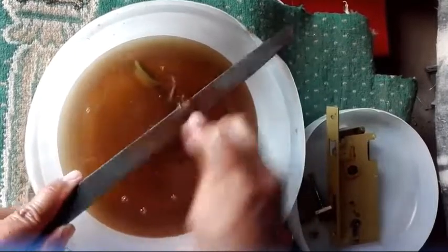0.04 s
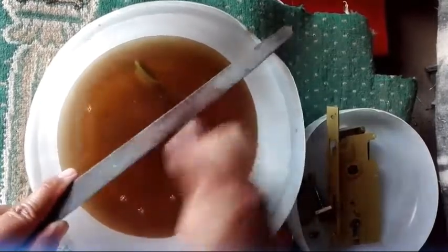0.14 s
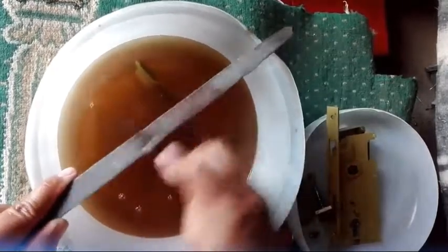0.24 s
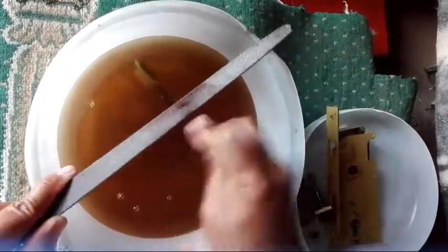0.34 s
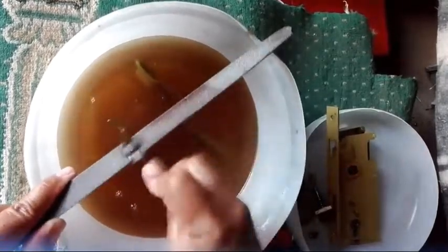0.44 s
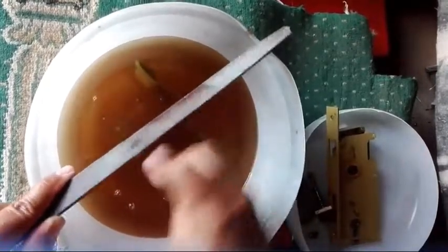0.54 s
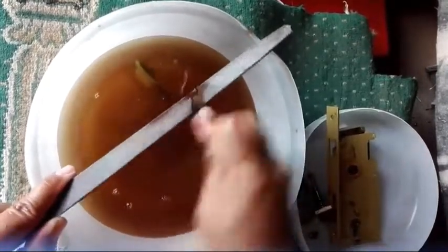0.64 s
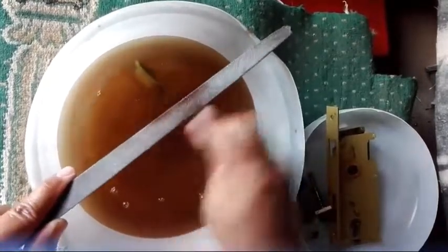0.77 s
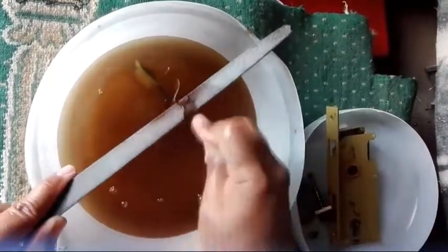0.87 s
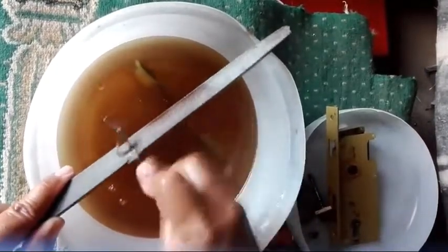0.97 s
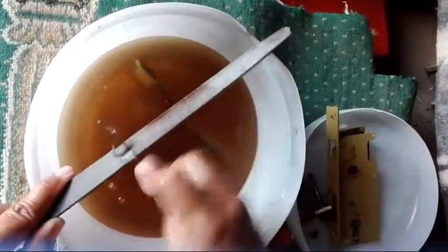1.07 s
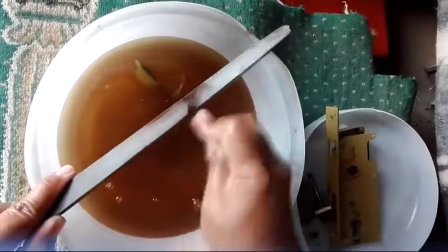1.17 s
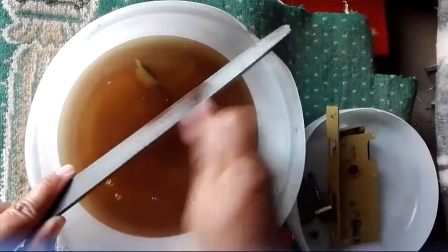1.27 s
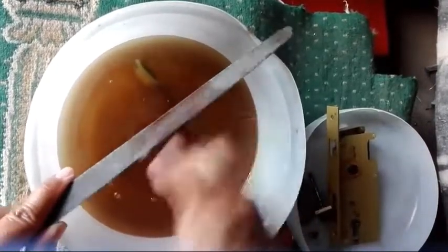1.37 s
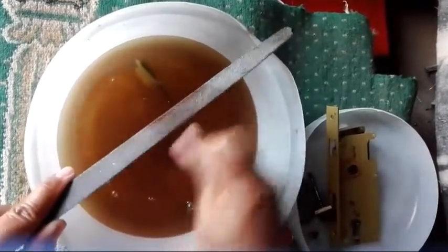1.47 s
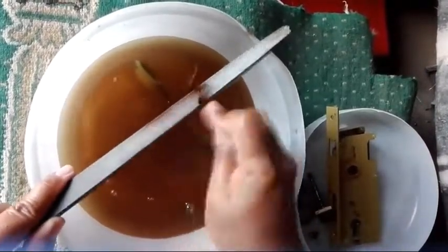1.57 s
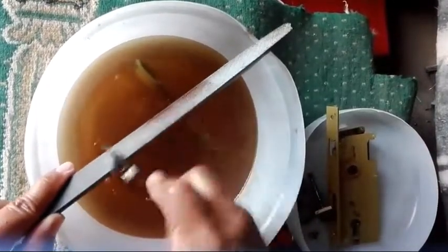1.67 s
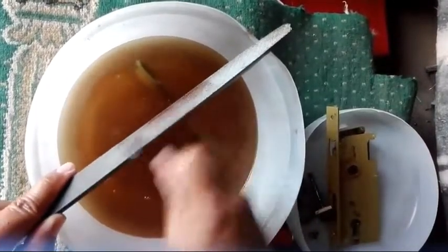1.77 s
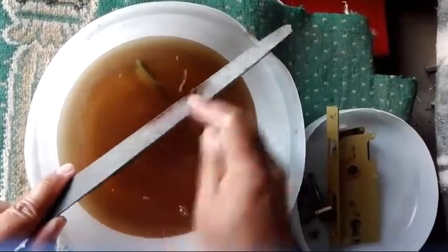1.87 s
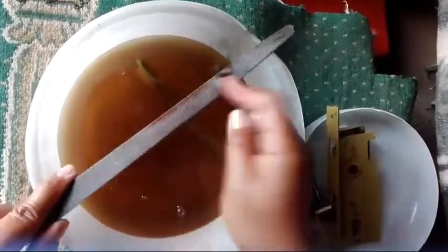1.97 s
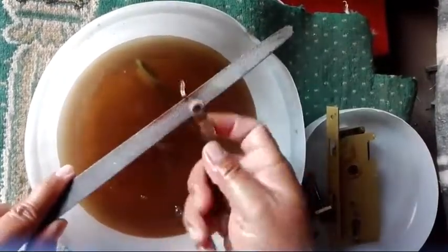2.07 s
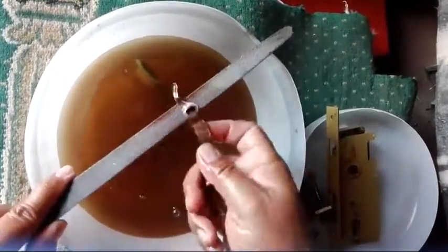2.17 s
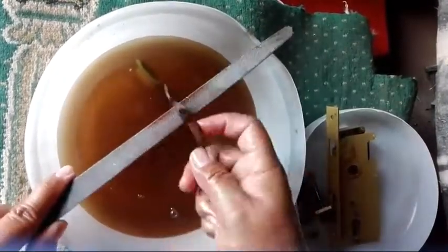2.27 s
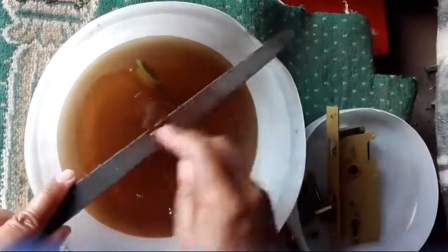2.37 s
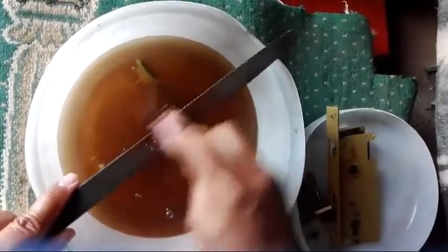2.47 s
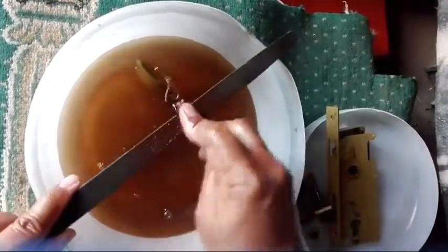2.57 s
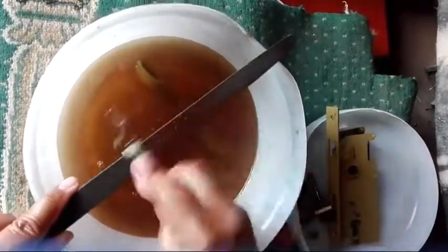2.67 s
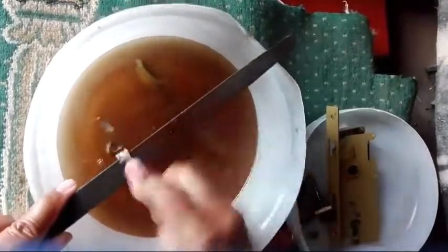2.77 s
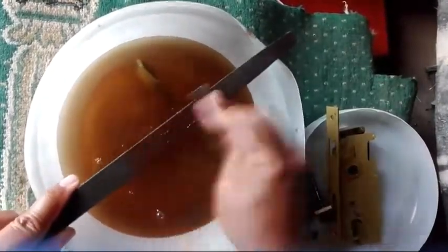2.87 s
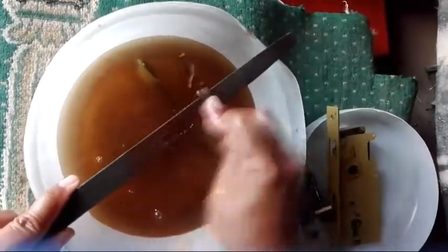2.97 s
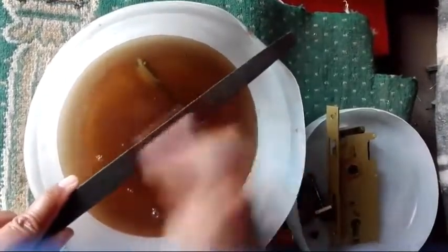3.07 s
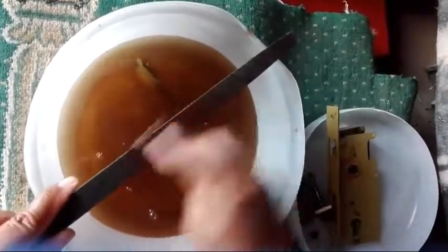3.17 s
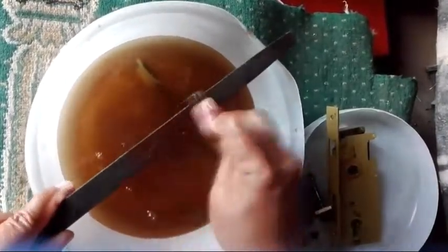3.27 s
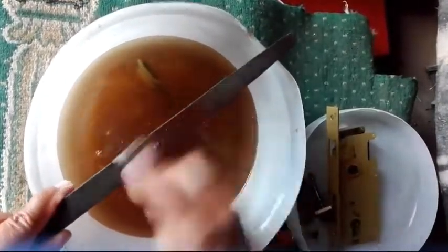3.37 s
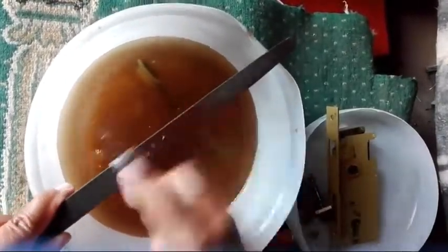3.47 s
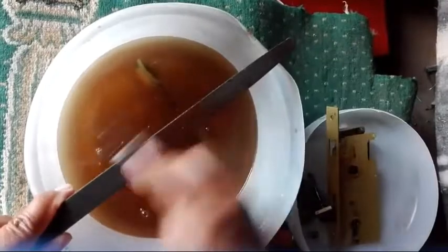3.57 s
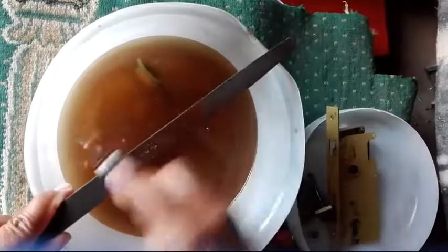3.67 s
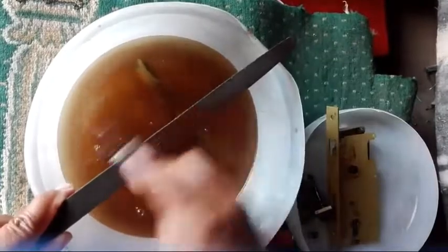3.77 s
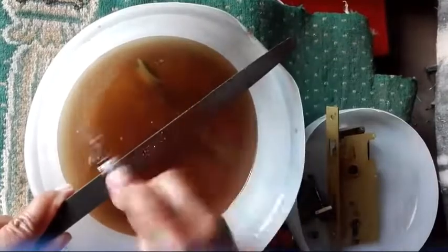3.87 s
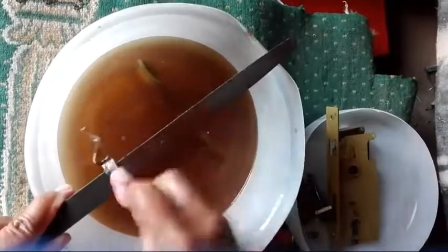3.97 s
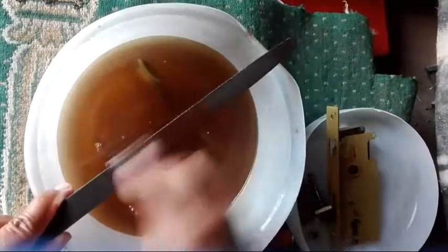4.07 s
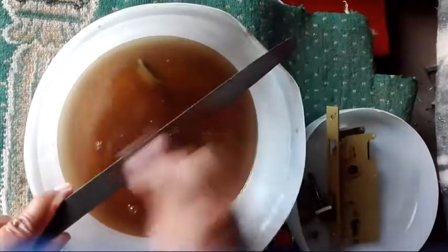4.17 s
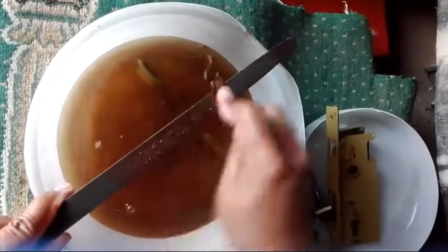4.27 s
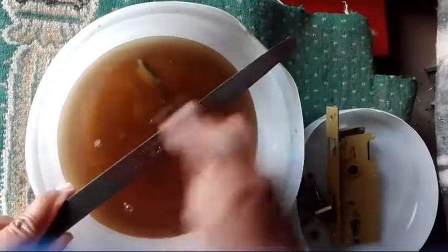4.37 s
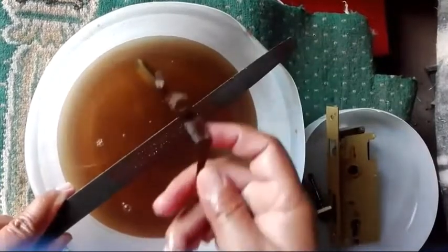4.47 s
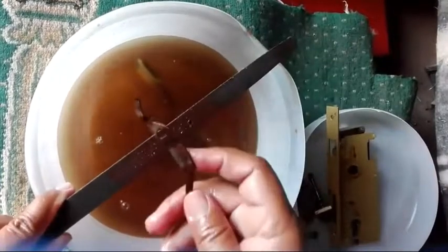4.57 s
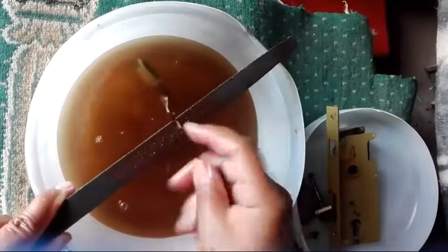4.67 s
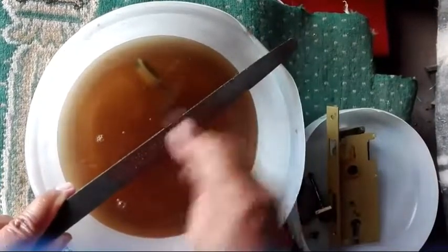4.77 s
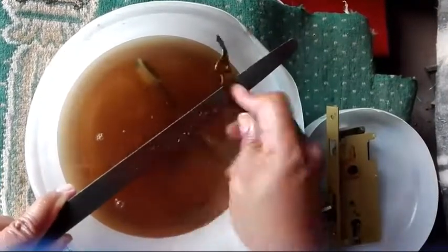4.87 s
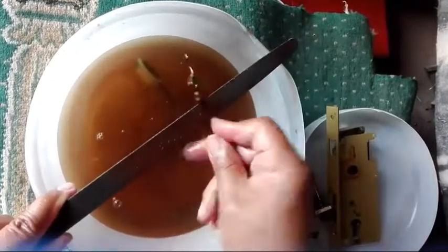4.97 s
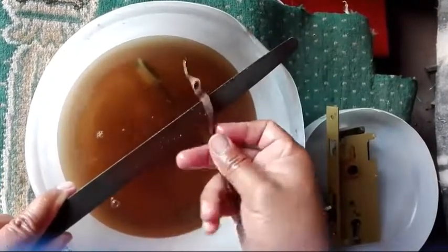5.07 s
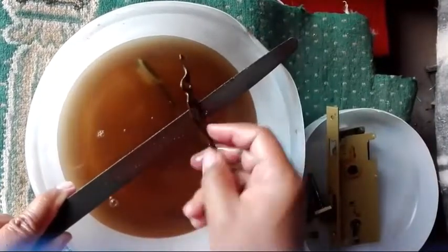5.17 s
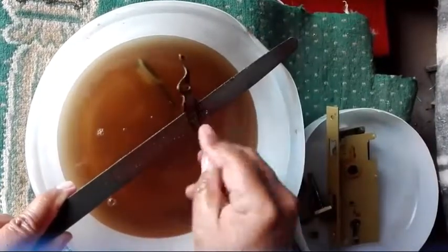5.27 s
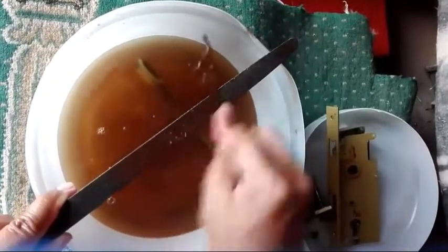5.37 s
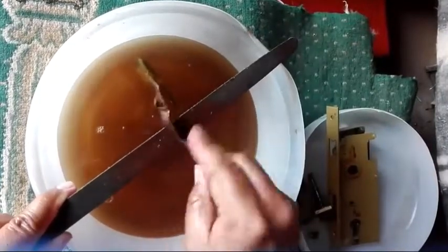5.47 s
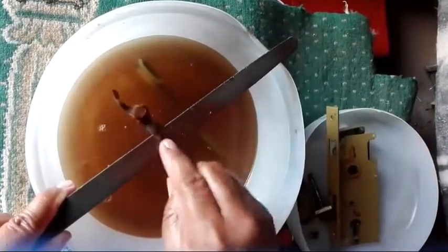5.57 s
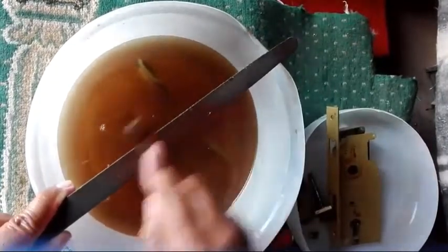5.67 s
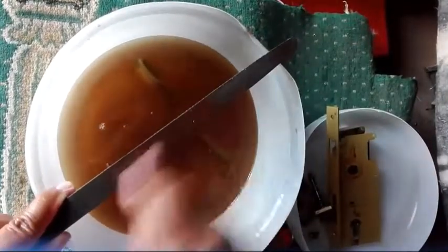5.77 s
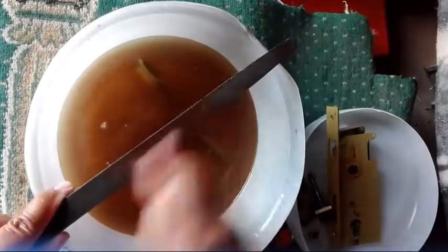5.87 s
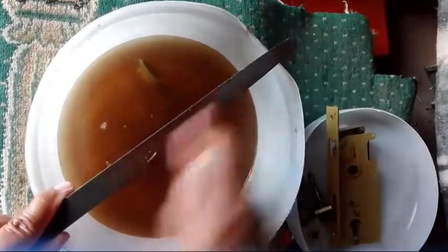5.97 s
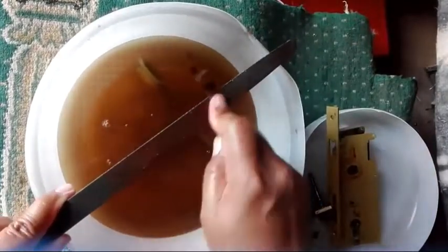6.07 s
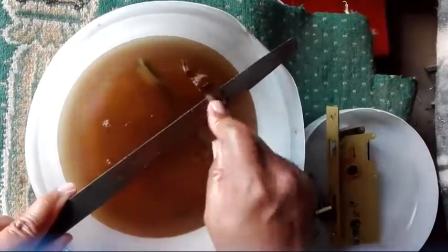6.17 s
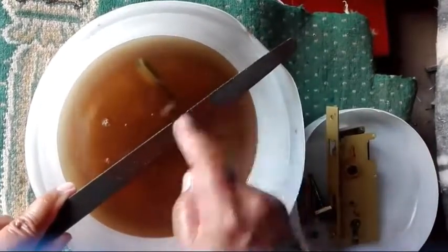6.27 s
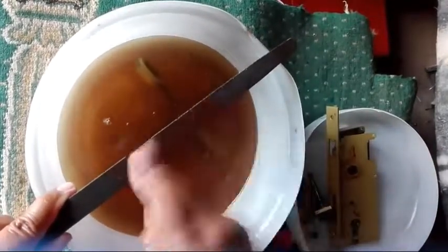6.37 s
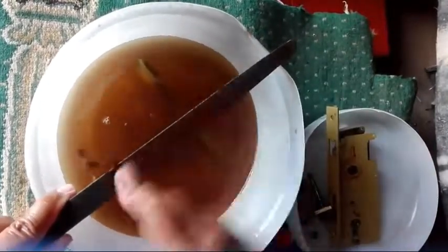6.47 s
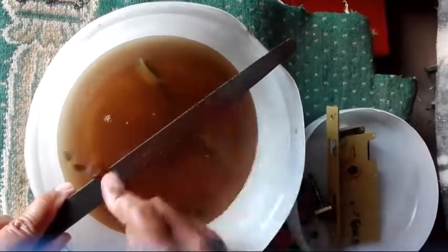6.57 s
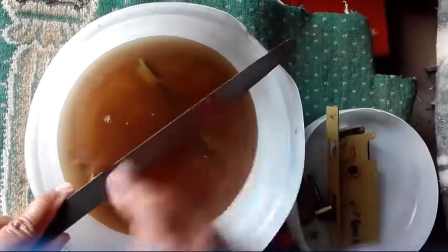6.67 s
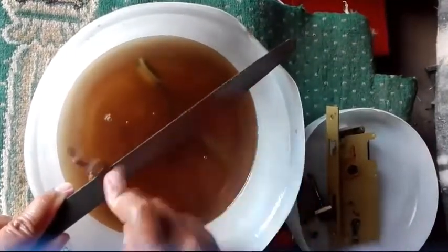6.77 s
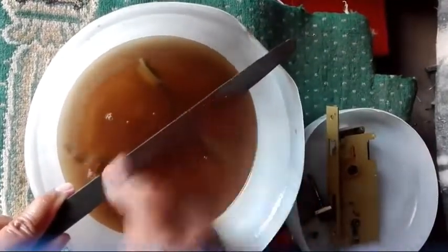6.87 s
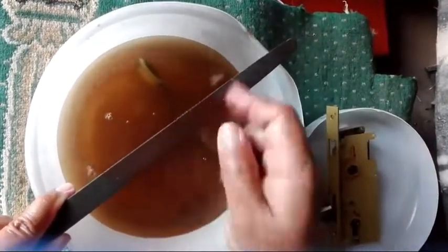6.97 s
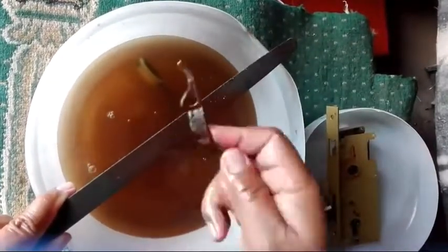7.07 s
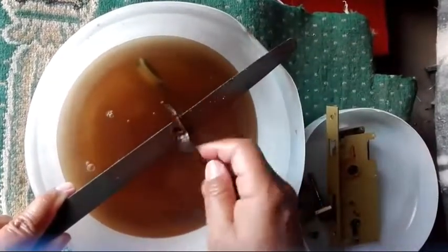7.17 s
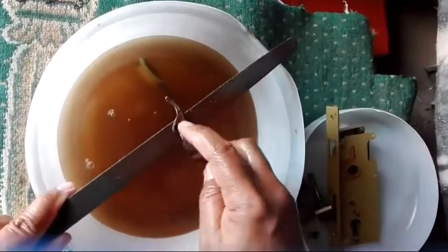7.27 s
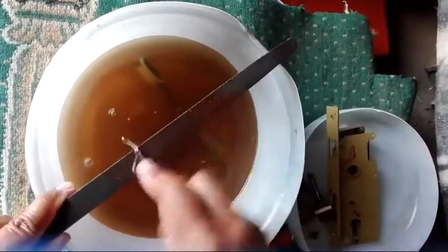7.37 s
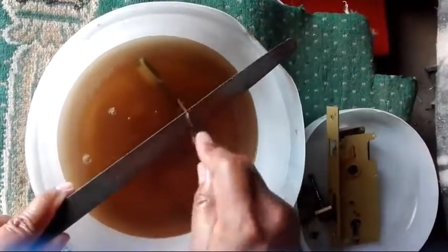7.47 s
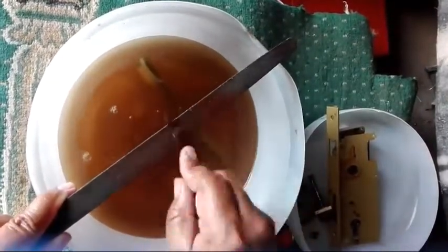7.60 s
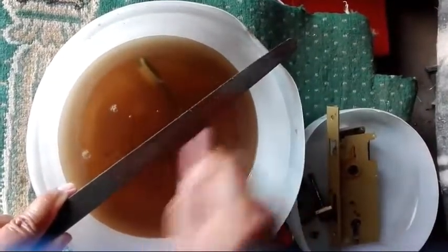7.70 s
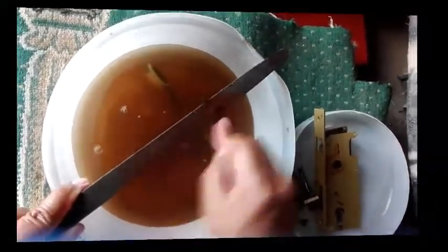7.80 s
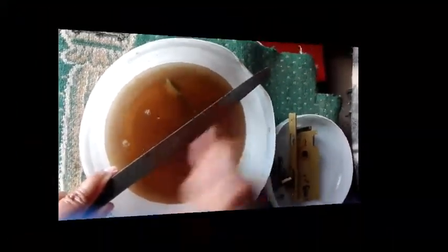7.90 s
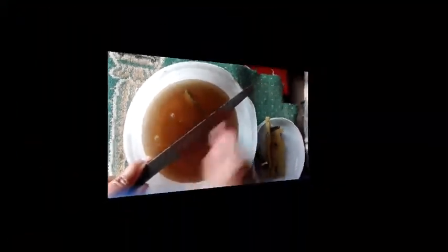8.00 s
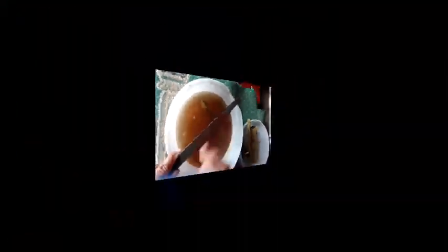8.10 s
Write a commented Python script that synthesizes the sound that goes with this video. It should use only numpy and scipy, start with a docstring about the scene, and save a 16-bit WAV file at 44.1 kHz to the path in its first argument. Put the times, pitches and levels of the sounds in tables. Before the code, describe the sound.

A small metal part scrapes rapidly to and fro on a flat file, bright gritty rasping in bursts with short pauses, close up indoors.

```python
"""A bright, gritty metal rasp runs quickly to and fro, close by, in bursts with short pauses.
A small metal part rubs a flat file that lies across a bowl of liquid, first on its face, then on its narrow edge.
Random tooth ticks, shaped by the speed of each stroke, ring the resonances of the file and the part.
Light taps ping, one dull knock sounds on the bowl, and a small, quiet room adds a faint tail, rumble and hiss."""
import sys
import numpy as np
from scipy import signal
from scipy.fft import rfft, irfft
from scipy.io import wavfile

SR = 44100
rng = np.random.default_rng(int(sys.argv[2]) if len(sys.argv) > 2 else 0)


def file_out(sig):
    """Save sig as 16-bit WAV at sys.argv[1]."""
    # one column per channel
    cols = np.atleast_2d(sig).T
    # limit, then scale
    lim = np.clip(cols, -1, 1)
    pcm = np.round(lim * 32767).astype(np.int16)
    wavfile.write(sys.argv[1], SR, pcm)


N = 358974

# Strokes of the part along the file: start_s, length_s, level_db, rise_share (part spent speeding up, 0-1)
STROKES = [(-0.0, 0.037, -31.5, 0), (0.033, 0.036, -28, 0.6), (0.063, 0.057, -32, 0.35),
           (0.122, 0.04, -30, 0.27), (0.159, 0.043, -29, 0.07), (0.198, 0.04, -32.5, 0.49),
           (0.229, 0.046, -37.5, 0.42), (0.277, 0.032, -36.5, 0.28), (0.313, 0.034, -42, 0.54),
           (0.35, 0.03, -36.5, 0.73), (0.382, 0.053, -36, 0.33), (0.416, 0.044, -31.5, 0.42),
           (0.454, 0.029, -33.5, 0.67), (0.468, 0.062, -34.0, 0.74), (0.528, 0.04, -38, 0.26),
           (0.559, 0.046, -35.5, 0.64), (0.6, 0.085, -34, 0.6), (0.679, 0.039, -33.5, 0.3),
           (0.714, 0.043, -35.5, 0.35), (0.758, 0.036, -32.5, 0.4), (0.799, 0.062, -33, 0.19),
           (0.861, 0.054, -29.5, 0.59), (0.901, 0.054, -35.5, 0.43), (0.955, 0.048, -32.5, 0.5),
           (0.991, 0.034, -33, 0.18), (1.024, 0.041, -34.0, 0.54), (1.066, 0.035, -36, 0.43),
           (1.104, 0.047, -31, 0.42), (1.147, 0.046, -34.5, 0.5), (1.188, 0.027, -32, 0.77),
           (1.221, 0.046, -33.0, 0.33), (1.266, 0.045, -31.5, 0.49), (1.309, 0.044, -31.5, 0.32),
           (1.329, 0.046, -30.5, 0.72), (1.373, 0.056, -31, 0.38), (1.427, 0.028, -32.5, 0.36),
           (1.449, 0.035, -35, 0.8), (1.488, 0.047, -30.0, 0.4), (1.535, 0.024, -31.5, 0.52),
           (1.554, 0.062, -35.5, 0.51), (1.611, 0.056, -32.5, 0.13), (1.638, 0.06, -34.0, 0.54),
           (1.737, 0.051, -38.5, 0.85), (1.78, 0.055, -40.5, 0.55), (1.838, 0.045, -34.5, 0.24),
           (1.865, 0.047, -35.0, 0.38), (1.906, 0.036, -39.5, 0.69), (1.943, 0.051, -35.0, 0.65),
           (1.993, 0.053, -33, 0.35), (2.424, 0.034, -44, 0.8), (2.45, 0.049, -43, 0.4),
           (2.506, 0.034, -41, 0.33), (2.542, 0.036, -34.5, 0.41), (2.646, 0.043, -36.5, 0.45),
           (2.692, 0.041, -37, 0.44), (2.73, 0.038, -31, 0.33), (2.763, 0.052, -30.5, 0.38),
           (2.816, 0.04, -26.5, 0.22), (2.857, 0.038, -29, 0.17), (2.89, 0.041, -25.5, 0.46),
           (2.931, 0.048, -30, 0.2), (2.972, 0.037, -23.5, 0.39), (3.011, 0.04, -30, 0.5),
           (3.047, 0.046, -27, 0.22), (3.085, 0.084, -26.5, 0.46), (3.165, 0.031, -33.5, 0.24),
           (3.193, 0.046, -25, 0.54), (3.242, 0.022, -29, 0.54), (3.265, 0.056, -30.0, 0.4),
           (3.305, 0.047, -34.5, 0.45), (3.34, 0.043, -26, 0.38), (3.389, 0.038, -31, 0.48),
           (3.423, 0.051, -29.0, 0.33), (3.473, 0.04, -35.5, 0.5), (3.512, 0.039, -21.5, 0.41),
           (3.554, 0.051, -38, 0.45), (3.605, 0.039, -27.5, 0.63), (3.63, 0.055, -37.5, 0.66),
           (3.681, 0.057, -27, 0.35), (3.744, 0.052, -36.5, 0.4), (3.794, 0.052, -30, 0.49),
           (3.852, 0.06, -35, 0.04), (3.901, 0.046, -24.5, 0.44), (3.961, 0.039, -36, 0.69),
           (4.006, 0.054, -25.5, 0.39), (4.047, 0.071, -40.5, 0.55), (4.112, 0.055, -25, 0.37),
           (4.169, 0.049, -33, 0.87), (4.224, 0.046, -22.0, 0.66), (4.28, 0.093, -35, 0.16),
           (4.352, 0.045, -26.5, 0.31), (4.402, 0.044, -31, 0.84), (4.753, 0.01, -27, 0.46),
           (4.801, 0.037, -33.0, 0.5), (4.839, 0.038, -27.5, 0.6), (4.877, 0.061, -38.5, 0.37),
           (4.94, 0.06, -36, 0.7), (5.005, 0.039, -48, 0.48), (5.073, 0.027, -56, 0.55),
           (5.23, 0.036, -67, 0.62), (5.359, 0.034, -45, 0.14), (5.406, 0.049, -36.5, 0.17),
           (5.455, 0.031, -31, 0.92), (5.478, 0.044, -45.5, 0.62), (5.525, 0.032, -51.5, 0.07),
           (5.621, 0.015, -58.5, 0), (5.663, 0.029, -53, 0.3), (5.725, 0.046, -41, 0.54),
           (5.777, 0.046, -30.5, 0.51), (5.834, 0.041, -29.5, 0.48), (5.872, 0.061, -30, 0.23),
           (5.929, 0.044, -33.0, 0.46), (5.969, 0.062, -32.5, 0.39), (6.014, 0.048, -34, 0.66),
           (6.05, 0.07, -30.0, 0.64), (6.135, 0.036, -55.5, 0.34), (6.304, 0.061, -46.5, 0.68),
           (6.352, 0.053, -38.5, 0.86), (6.401, 0.051, -32.5, 0.46), (6.452, 0.055, -33, 0.46),
           (6.502, 0.05, -29.5, 0.41), (6.548, 0.056, -28.0, 0.24), (6.599, 0.034, -28, 0.93),
           (6.628, 0.073, -30.0, 0.58), (6.698, 0.055, -29.5, 0.49), (6.753, 0.055, -32.5, 0.56),
           (6.806, 0.044, -27.5, 0.25), (6.847, 0.047, -31.0, 0.83), (6.889, 0.065, -29.5, 0.56),
           (6.952, 0.064, -31.0, 0.44), (7.223, 0.023, -39, 0.64), (7.411, 0.038, -31, 0.33),
           (7.444, 0.052, -33.5, 0.55), (7.507, 0.043, -45, 0.01), (7.605, 0.011, -36, 0.5),
           (7.681, 0.04, -47.5, 0.35), (7.725, 0.044, -36, 0.45), (7.772, 0.046, -37, 0.15),
           (7.825, 0.049, -31, 0.17), (7.86, 0.059, -37.5, 0.4), (7.923, 0.044, -36.5, 0.36),
           (7.962, 0.05, -39, 0.6), (8.005, 0.046, -40.5, 0.47), (8.057, 0.047, -44.0, 0.47),
           (8.091, 0.093, -48.5, 0.46)]
# Brief sharp peaks within a stroke: time_s, level_db
PEAKS = [(0.041, -26.5), (0.126, -25), (.897, -29), (1.208, -25), (3.055, -23), (3.119, -21),
         (4.024, -26.5), (4.143, -30.5), (4.755, -26.5), (6.818, -24), (7.233, -42), (7.606, -31)]
# The part taps the file lightly: time_s, level_db (before the offsets of tick and ping)
TOUCHES = [(2.121, -77.5), (2.173, -70), (2.226, -70), (2.273, -73.5), (2.4, -67), (4.772, -45.5),
           (5.28, -69), (5.584, -73), (5.708, -70)]
# Relative rasp spectrum on the face of the file: pitch_hz, density_db (per Hz)
FACE_SPECTRUM = [(40, -10.5), (120, -19.5), (260, -33), (500, -25.5), (800, -22), (1150, -15.5),
                 (1750, -7.5), (2260, -23.5), (2750, -12), (3600, -8.5), (4800, -4.5), (7000, -2),
                 (9800, -4), (11500, -4), (14500, -11.5)]
# Relative rasp spectrum on the edge of the file: pitch_hz, density_db (per Hz)
EDGE_SPECTRUM = [(40, -5), (120, -12.5), (300, -21.5), (470, -13.5), (600, -17.5), (820, -13), (1050, -8),
                 (1600, -0.5), (2300, -10.5), (3600, -1.5), (5600, -1.5), (8000, 2), (9900, 0.5),
                 (11200, 6), (14500, -3)]
# Modes of the file on the bowl, before the change of contact: pitch_hz, width_hz, lift_db
FILE_MODES = [(438, 54, 7), (683, 58, 6.5), (984, 110, 8), (1750, 58, 10), (3151, 97, 14.5),
              (4627, 150, 15), (6430, 110, 9), (8760, 200, 9), (11410, 160, 5.5)]
# The part rings differently with each grip: start_s, end_s, pitch_hz, width_hz, lift_db
GRIP_MODES = [(0, 0.73, 3140, 170, 6.5), (0, 0.85, 13000, 3000, 1.5), (.5, 2.1, 5380, 190, 10),
              (.8, 2.1, 4230, 220, 9), (2.6, 4.1, 7060, 130, -1), (2.6, 3.4, 7500, 330, 6),
              (3.4, 6.5, 4200, 396, 2), (3.4, 5.7, 9140, 400, 4), (3.9, 6.1, 1820, 69.6, 5),
              (4.7, 6, 6350, 197, 4), (5.7, 7.1, 13500, 2200, 1.5), (7.6, 8.2, 1560, 197, 7.5),
              (7.6, 10.8, 2400, 590, 8.5), (7.6, 10, 6300, 500, 2.5)]
# Changing low body of the strokes as the hand shifts: time_s, body_db
BODY_CURVE = [(0, 2.5), (1.05, -2.5), (1.4, 0.5), (1.85, 2), (3.2, 2), (3.65, -0.5), (4.1, 1), (4.42, -4.5),
              (4.85, 2.5), (5.4, 5), (5.55, -8), (5.87, 2.5), (6.1, 2.5), (6.45, -5.5), (6.9, 1),
              (7.6, -5.5), (7.74, 8), (8.1, 6)]
# Changing treble tilt of the strokes: time_s, bright_db
BRIGHT_CURVE = [(0, 3), (.7, 2), (.9, -2), (1.9, -1.5), (2.85, 2.5), (3.6, -2), (4.1, 2), (4.35, -3),
                (4.85, 5), (5.1, -5.5), (5.65, -1.5), (5.85, 7.5), (6.35, -1), (6.65, 3.5), (7.25, 3),
                (7.5, -5), (7.6, 8), (8.1, 11.5)]
# Modes that ring on after a light tap: pitch_hz, level_db (relative), t60_s
PING_MODES = [(1675, -0.5, 0.067), (4620, 5.5, 0.025), (6540, -10, 0.025)]
# Relative spectrum of the dull knock on the bowl: pitch_hz, density_db (per Hz)
KNOCK_SPECTRUM = [(50, -11), (200, -17), (450, -9.5), (800, -9.5), (1500, 2), (2300, -14), (3400, -1),
                  (4800, -22), (14000, -22)]
# Relative spectrum of the quiet room: pitch_hz, density_db (per Hz)
QUIET_SPECTRUM = [(30, -3.5), (60, -6), (130, -13), (220, -25), (450, -34.5), (14500, -46.5)]
# Stereo width of the rasp, wider in the treble: pitch_hz, side_minus_mid_db
WIDTH = [(2400, -39), (3900, -29), (4500, -16), (7900, -11.5), (14000, -8)]

TURN_S = 2.3  # the file is turned from its face onto its edge between two bursts
BODY_HZ = 2700  # the low body lies below this
BRIGHT_FROM_HZ, BRIGHT_TO_HZ = 4600, 12000  # brightness tilts the treble between these
# A harder stroke bites more than it rocks the file: change in dB per dB over a usual stroke
USUAL_STROKE_DB, BODY_PER_DB, BRIGHT_PER_DB = -34.5, -0.1831, 0.14
KNOCK_S, KNOCK_DB = 1.7215, -29.5
ROOM_T60_S, QUIET_DB = .15, -70
TOP_HZ = 14320  # upper limit of the sound
SIZE = 4096  # samples in an impulse response
FREQS = np.maximum(np.arange(SIZE // 2 + 1) * SR / SIZE, 1)


def rasp(swell=1.76, peak_s=0.0041, drag_db=-25, drag_s=0.017, lead=.35, bite_body_db=-4,
         rock_db=-3, rock_hz=130, rock_swell=0.37, lurch_db=2.5):
    """Each stroke speeds up and slows to a turn, through which the part drags faintly; the file rocks under it."""
    out = np.zeros((2, N))
    low_pass_db = -10 * np.log10(1 + (FREQS / BODY_HZ) ** 10)
    for start, length, db, rise_share in STROKES:
        rise = length * np.clip(rise_share, .05, .95)
        fastest, end = start + rise, start + length
        body_db, bright_db = tone(fastest, db)
        lead_s = lead * rise  # a quick stroke lands abruptly, a slow one creeps in
        t = np.arange(max(start - lead_s, 0), end + drag_s, 1 / SR)
        speed = np.sin(np.pi / 2 * np.interp(t, [start, fastest, end], [0, 1, 0]))
        drag_fade = np.interp(t, [start - lead_s, start, end, end + drag_s], [0, 1, 1, 0])
        drag = undb(drag_db) * drag_fade

        # the bite of the teeth
        push = undb(db) * np.hypot(speed ** swell, drag)
        for s, peak_db in PEAKS:
            if start < s < end:
                peak = undb(peak_db) * np.exp(-((t - s) / peak_s) ** 2)
                push = np.hypot(push, peak)
        bite_spectrum = blade(fastest, body_db + bite_body_db, bright_db)
        add(out, t[0], ring(push * teeth(t, speed), bite_spectrum))

        # uneven lurches shake the low modes into brief pitched grains, also where the stroke is slow
        lurch = unit(undb(lurch_db * wander(t, 1 / rock_hz)))
        rock = undb(db + rock_db) * np.hypot(speed ** rock_swell, drag) * lurch
        low_modes = blade(fastest, body_db, bright_db, ripple_db=11.0, ripple_hz=115.0) + low_pass_db
        add(out, t[0], ring(rock * teeth(t, speed), low_modes))
    return out


def teeth(t, speed, rate_hz=16000, spread_db=1.5, chatter_hz=380, chatter_db=2.0):
    """Ticks of single teeth, denser at speed, in uneven clusters as the part chatters; rows are mid and side."""
    share = np.clip(rate_hz / SR * (.25 + speed), .001, 1)  # chance of a tick in each sample
    struck = rng.random(len(t)) < share
    strength = undb(spread_db * rng.standard_normal(len(t)))
    ticks = struck * strength / np.sqrt(share)  # denser ticks are no louder
    chatter = undb(chatter_db * wander(t, 1 / chatter_hz))
    return unit(ticks * chatter * rng.standard_normal((2, len(t))))


def blade(s, body_db, bright_db, contact_db=2, detune=0.02, face_share=0.59, ripple_db=6.0, ripple_hz=170):
    """Spectrum of file and part; the place of contact shifts the modes and favours others on every stroke."""
    on_face = s < TURN_S
    mode_share = face_share if on_face else 1
    db = colour(FACE_SPECTRUM if on_face else EDGE_SPECTRUM)
    db = db + ripple_db * np.tanh(wander(FREQS, ripple_hz))  # many weak modes
    for hz, width_hz, mode_db in FILE_MODES:
        shift, favour = rng.uniform(-1, 1, 2)
        shifted_hz = hz * (1 + detune * shift)
        db = db + lift(shifted_hz, width_hz, mode_db * mode_share + contact_db * favour)
    for start, end, hz, width_hz, mode_db in GRIP_MODES:
        db = db + (start <= s < end) * lift(hz, width_hz, mode_db)
    db = db + colour([(BRIGHT_FROM_HZ, -bright_db / 2), (BRIGHT_TO_HZ, bright_db / 2)])
    # level the part above the low body, then set the body against it
    above_body = (FREQS > BODY_HZ) * (FREQS < TOP_HZ)
    db = db - 10 * np.log10(np.mean(undb(db) ** 2 * above_body))
    return db + body_db / (1 + (FREQS / BODY_HZ) ** 8)


def tone(s, db, body_scatter_db=0.16, bright_scatter_db=0.17):
    """Low body and brightness of a stroke in dB: they change over time, follow the force and scatter a little."""
    harder_db = db - USUAL_STROKE_DB
    body_chance, bright_chance = rng.standard_normal(2)
    body_now_db = np.interp(s, *np.transpose(BODY_CURVE))
    bright_now_db = np.interp(s, *np.transpose(BRIGHT_CURVE))
    body_db = body_now_db + BODY_PER_DB * harder_db + body_scatter_db * body_chance
    bright_db = bright_now_db + BRIGHT_PER_DB * harder_db + bright_scatter_db * bright_chance
    return body_db, bright_db


def touches(decay_s=0.0062, tick_db=-5, ping_db=-2, body_db=5, bright_db=-9):
    """Light taps: a short burst of ticks, and with it the hardly damped blade pings in decaying sines."""
    out, t = np.zeros((2, N)), np.arange(SIZE) / SR
    fade = np.exp(-t / decay_s)
    ping = np.zeros(SIZE)
    for hz, db, t60 in PING_MODES:
        ping += undb(db - 60 * t / t60) * np.sin(2 * np.pi * hz * t)
    for s, db in TOUCHES:
        tick = undb(db + tick_db) * fade * teeth(t, fade)
        add(out, s, ring(tick, blade(s, body_db, bright_db)))
        add(out[0], s, undb(db + ping_db) * ping)
    return out


def knock(decay_s=0.0065):
    """The file knocks once on the bowl: a short noise rattle rings the bowl and the lowest file mode."""
    out, t = np.zeros(N), np.arange(SIZE) / SR
    bowl = response(colour(KNOCK_SPECTRUM) + lift(*FILE_MODES[0]))
    bowl = bowl / np.linalg.norm(bowl)
    rattle = np.exp(-t / decay_s) * rng.standard_normal(SIZE)
    add(out, KNOCK_S, undb(KNOCK_DB) * signal.fftconvolve(rattle, bowl))
    return out


def room(x, low_db=-23, high_db=-37):
    """A faint, short tail of decaying noise, duller than the direct sound."""
    t = np.arange(SR // 2) / SR
    after_gap = t > .004  # s
    tail = rng.standard_normal((2, len(t))) * undb(-60 * t / ROOM_T60_S) * after_gap
    tail = tail / np.linalg.norm(tail[0])
    dulling = response(colour([(1700, low_db), (5000, high_db)]))
    tail = signal.fftconvolve(tail, dulling[None], axes=1)
    return signal.fftconvolve(x, tail, axes=1)[:, :N]


def quiet(apart_db=-5, apart_hz=4500):
    """Low rumble and faint hiss from filtered noise; the top of the hiss differs between left and right."""
    apart = apart_db - 10 * np.log10(1 + (apart_hz / FREQS) ** 6)
    side_db = np.maximum(apart, WIDTH[0][1])
    layers = []
    for db in (0, side_db):
        noise = rng.standard_normal(N + SIZE)
        filtered = signal.fftconvolve(noise, response(colour(QUIET_SPECTRUM) + db))
        layers.append(filtered[SIZE:N + SIZE])  # skip the filter's onset
    mid, side = layers
    return undb(QUIET_DB) * np.array([mid + side, mid - side]) / np.std(mid)


def ring(force, db):
    """Pass the mid and side forces through a spectrum; the side gets the stereo width."""
    mid = signal.fftconvolve(force[0], response(db))
    side = signal.fftconvolve(force[1], response(db + colour(WIDTH)))
    return np.array([mid, side])


def undb(db):
    """Decibels to gain."""
    return 10 ** (np.asarray(db) / 20)


def colour(points):
    """Join (pitch_hz, level_db) points on a log-frequency axis."""
    hz, db = np.transpose(points)
    return np.interp(np.log(FREQS), np.log(hz), db)


def lift(hz, width_hz, db):
    """The bump in dB that one resonance adds to a spectrum."""
    return 10 * np.log10(1 + (undb(db) ** 2 - 1) / (1 + (2 * (FREQS - hz) / width_hz) ** 2))


def response(db):
    """Causal (minimum-phase) impulse response of a spectrum in dB, by folding its cepstrum."""
    cepstrum = irfft(np.log(undb(db)))
    cepstrum[1:SIZE // 2] *= 2
    cepstrum[SIZE // 2 + 1:] = 0
    return irfft(np.exp(rfft(cepstrum)))


def wander(axis, step):
    """A random line through normal knots of spread 1, one every step."""
    knots = np.arange(axis[0] - step * rng.random(), axis[-1] + step, step)
    return np.interp(axis, knots, rng.standard_normal(len(knots)))


def unit(x):
    """Scale to rms 1."""
    return x / np.sqrt(np.mean(x ** 2))


def add(out, s, sound):
    """Mix a sound into out at time s."""
    i = max(int(s * SR), 0)
    n = min(sound.shape[-1], N - i)
    out[..., i:i + n] += sound[..., :n]


def scene():
    """Rasp, taps and knock lie straight ahead with a spread treble; the room tail and the quiet surround them."""
    near = rasp() + touches()
    near[0] += knock()
    mid, side = near + room(near)
    return mid + quiet() + np.array([side, -side])  # left is mid + side, right is mid - side


def record(dry):
    """A steep elliptic low-pass cuts the top."""
    top_cut = signal.ellip(12, .2, 70, TOP_HZ, fs=SR, output="sos")
    return signal.sosfilt(top_cut, dry)


dry = scene()
out = record(dry)
file_out(out)
```